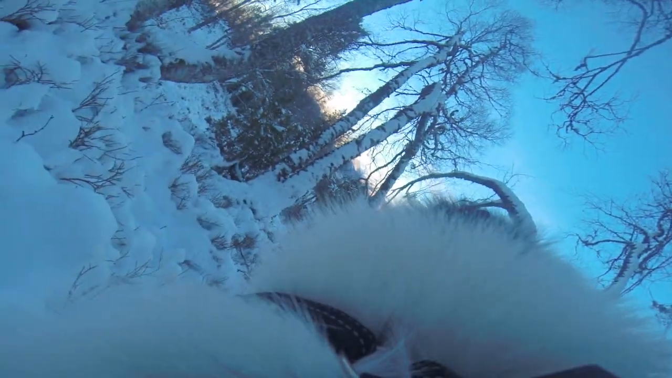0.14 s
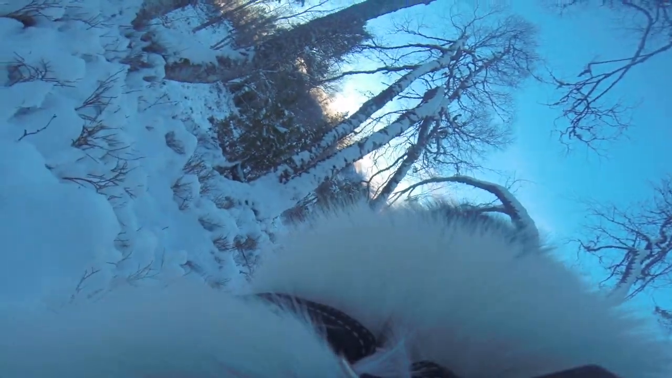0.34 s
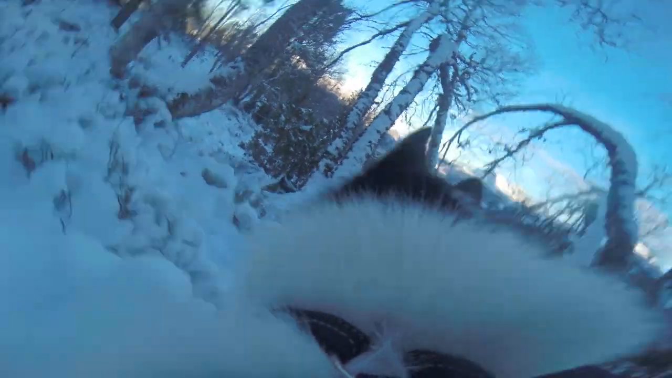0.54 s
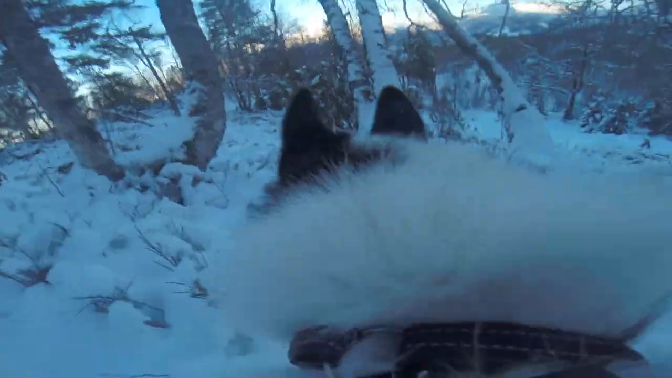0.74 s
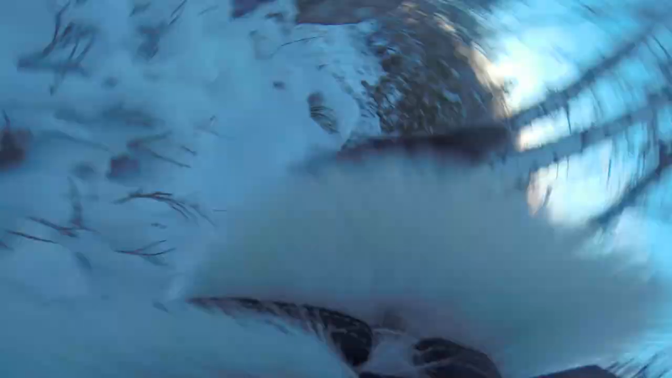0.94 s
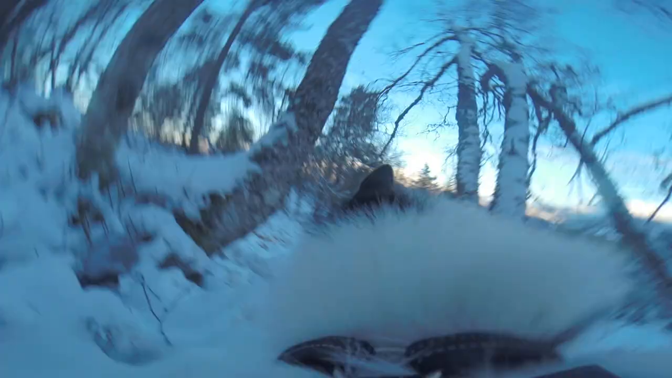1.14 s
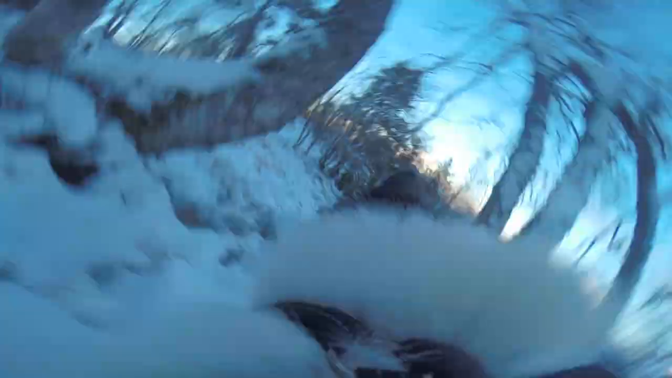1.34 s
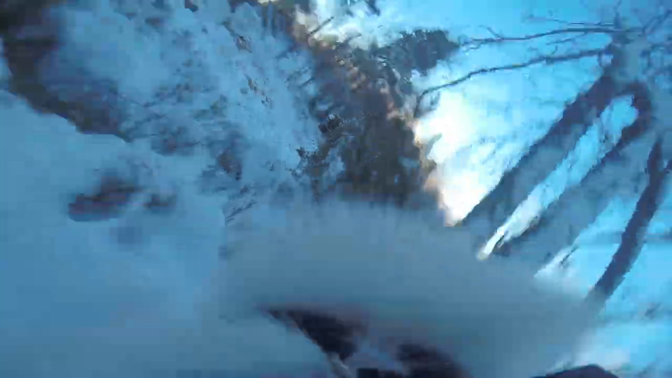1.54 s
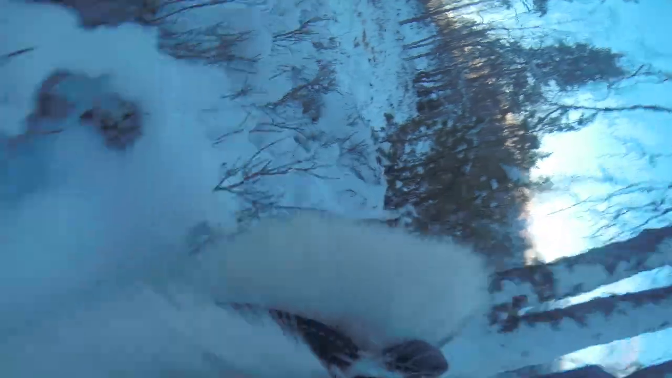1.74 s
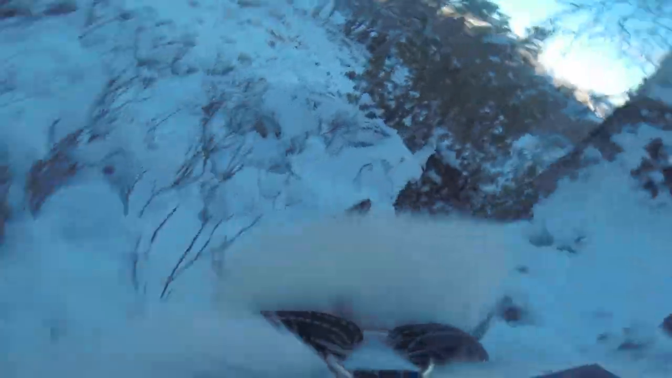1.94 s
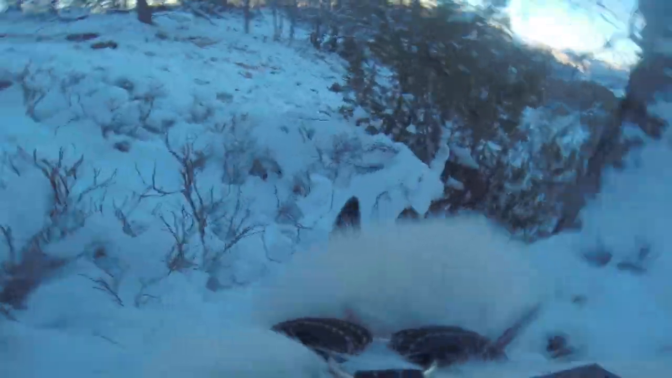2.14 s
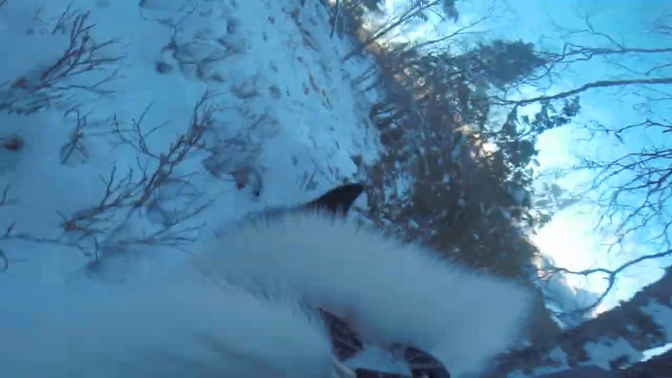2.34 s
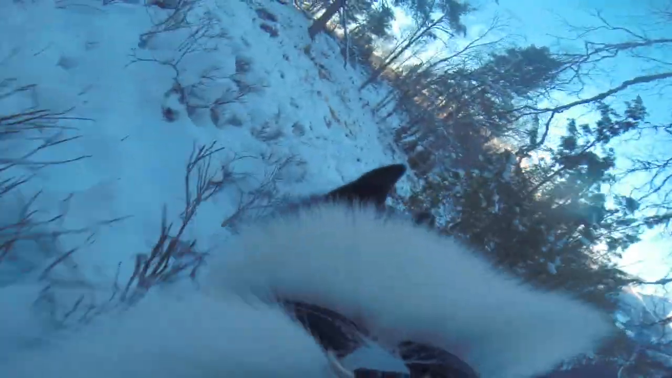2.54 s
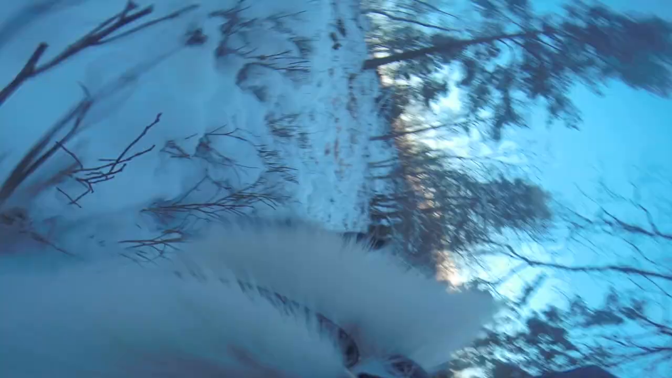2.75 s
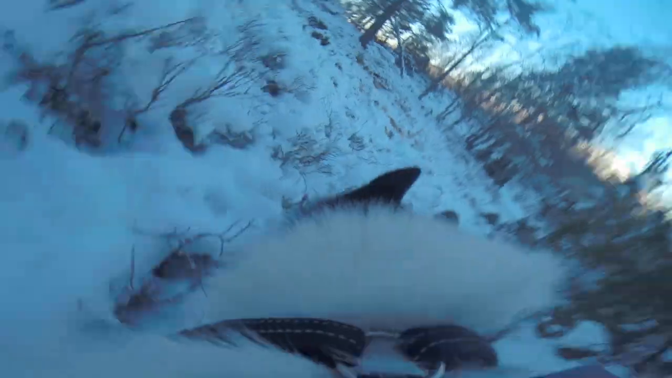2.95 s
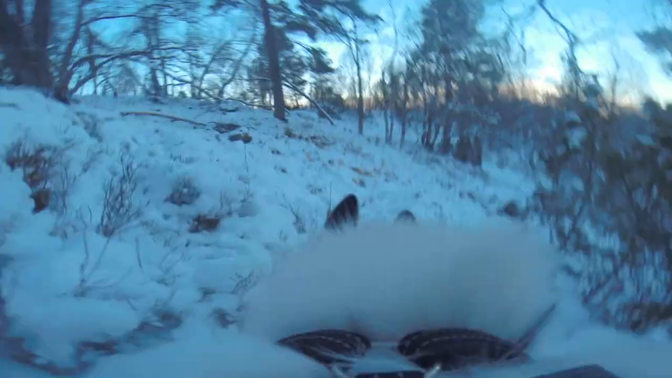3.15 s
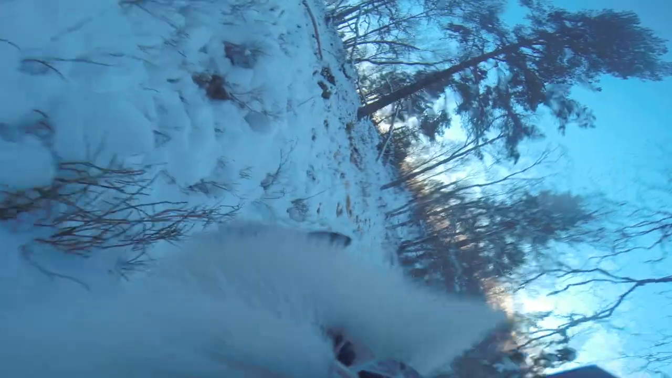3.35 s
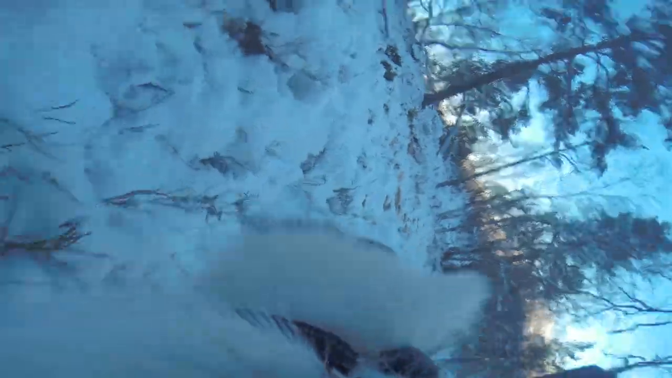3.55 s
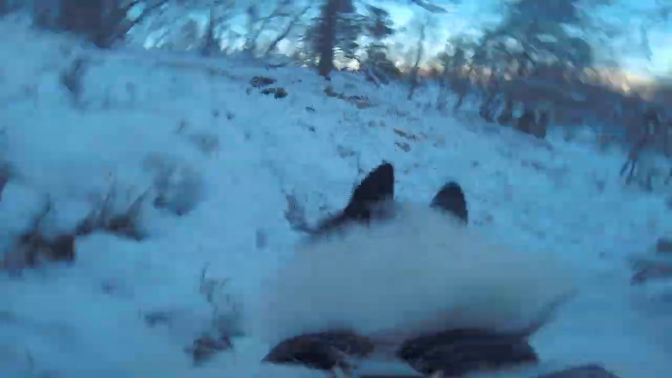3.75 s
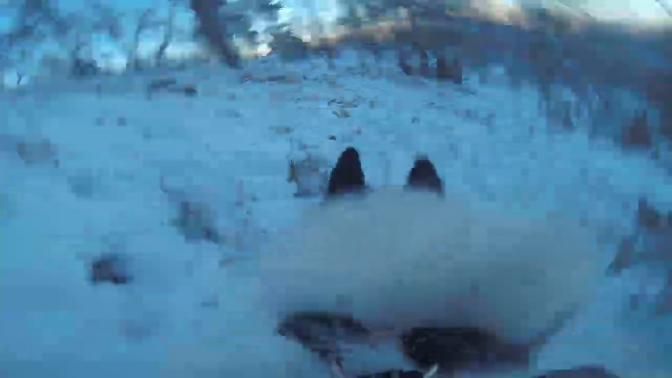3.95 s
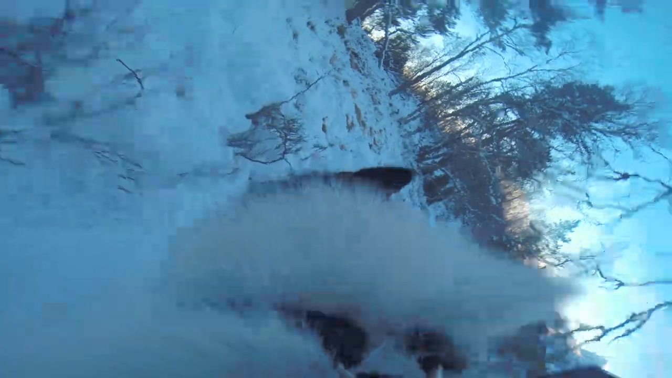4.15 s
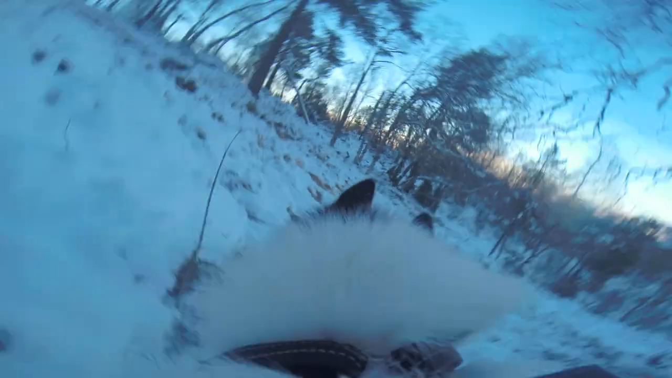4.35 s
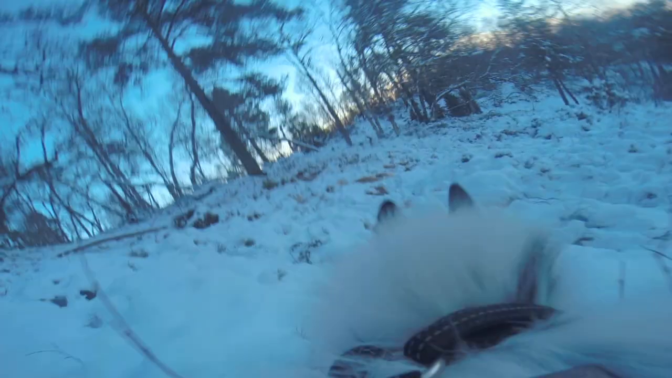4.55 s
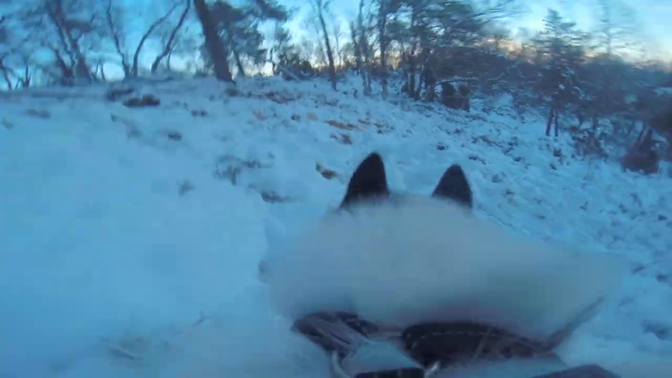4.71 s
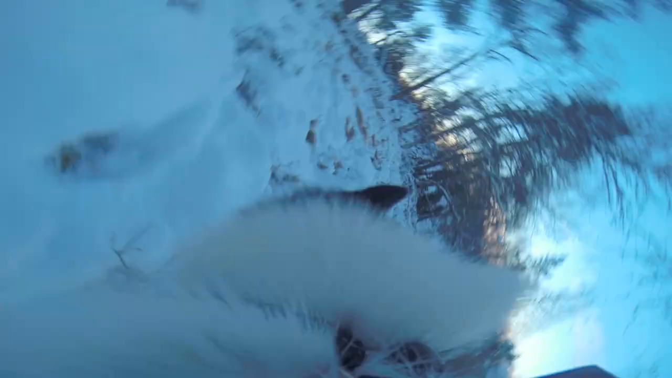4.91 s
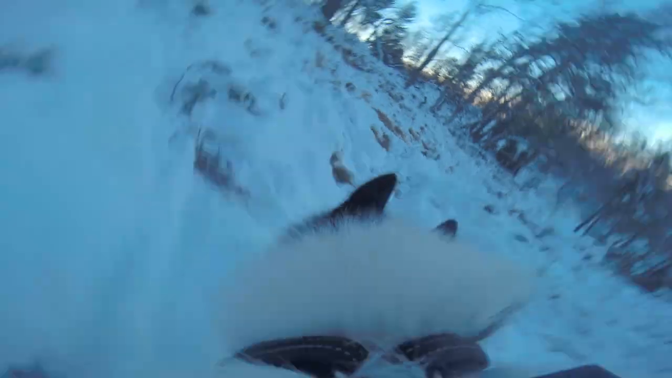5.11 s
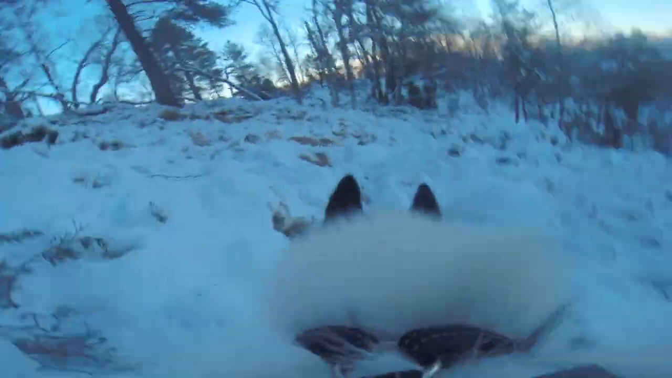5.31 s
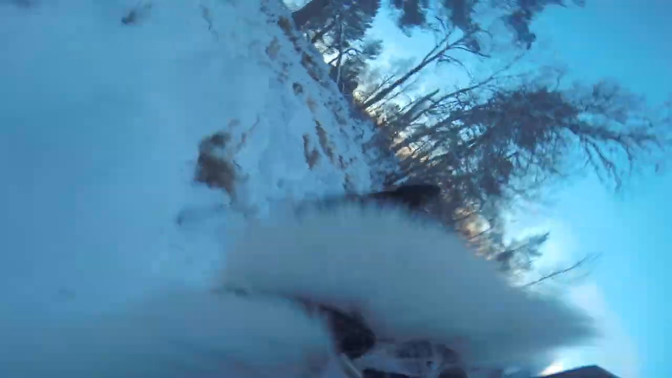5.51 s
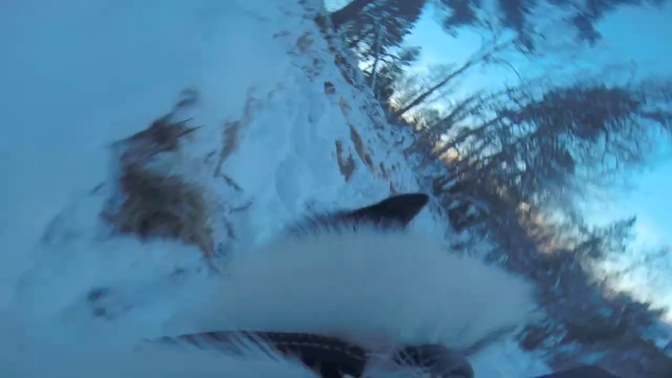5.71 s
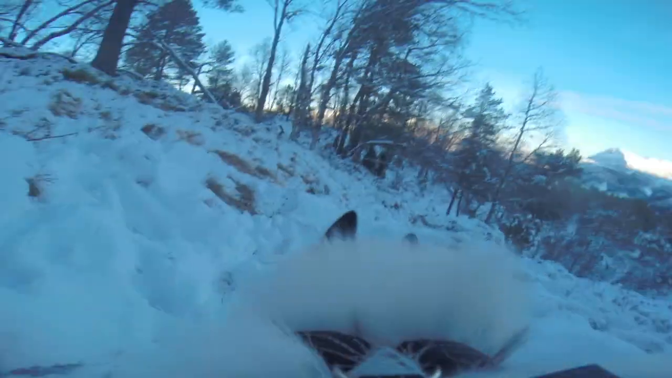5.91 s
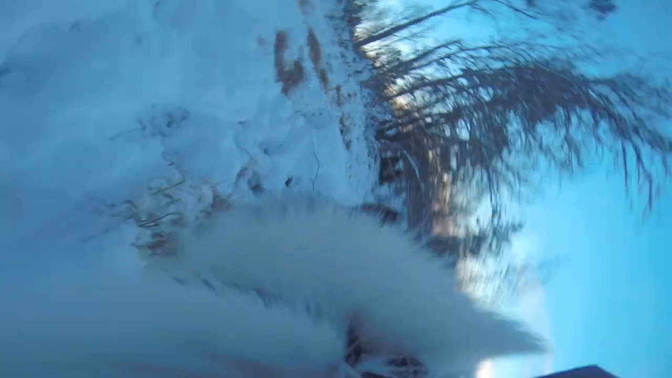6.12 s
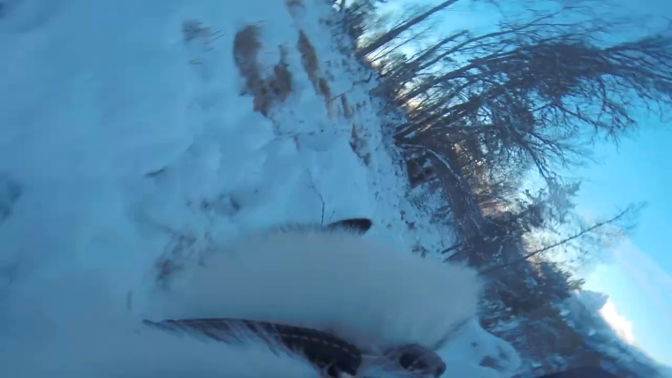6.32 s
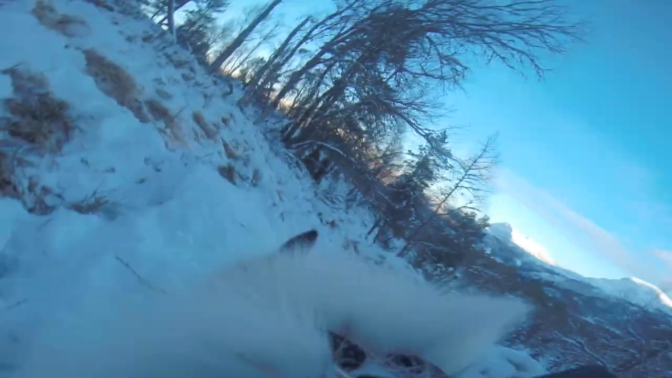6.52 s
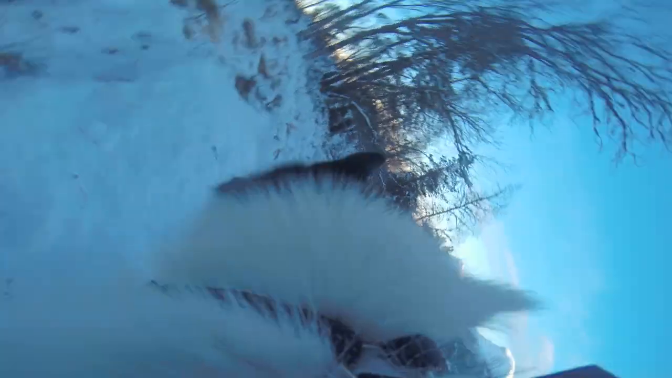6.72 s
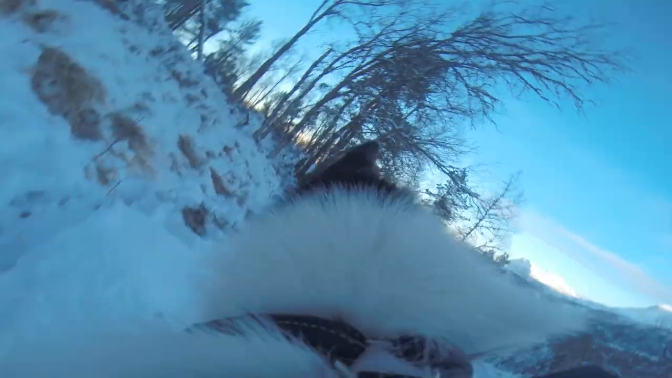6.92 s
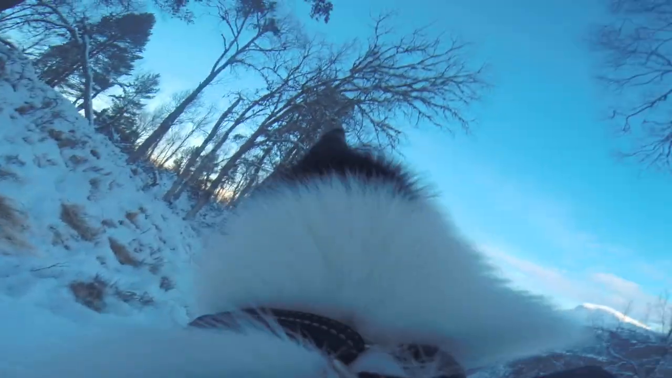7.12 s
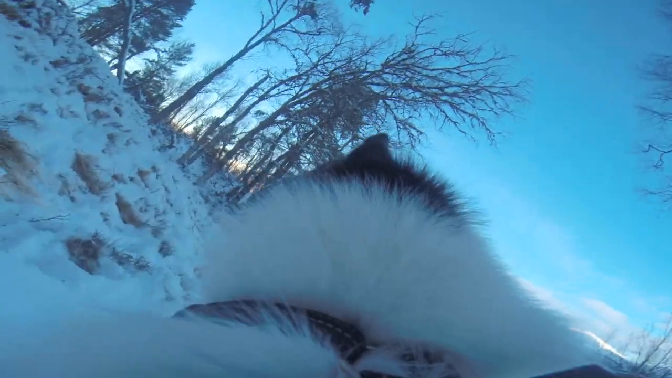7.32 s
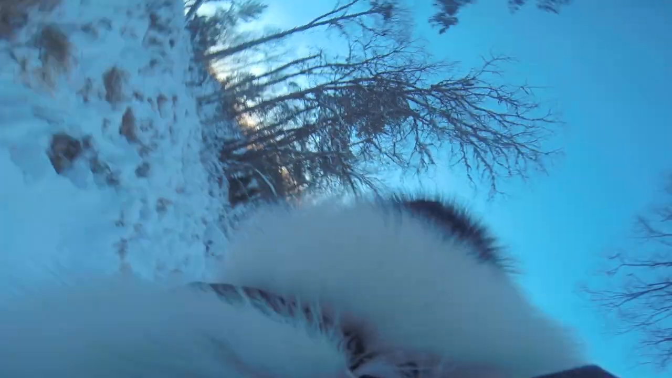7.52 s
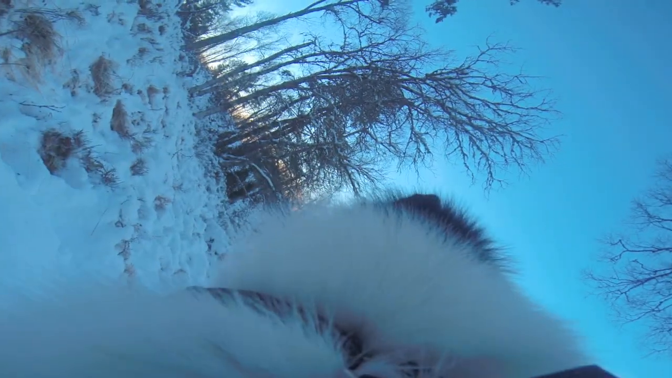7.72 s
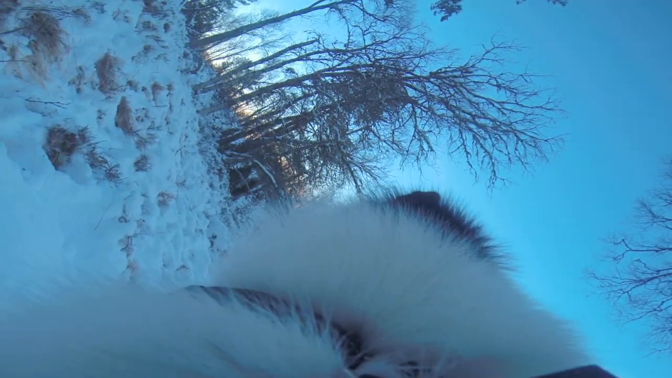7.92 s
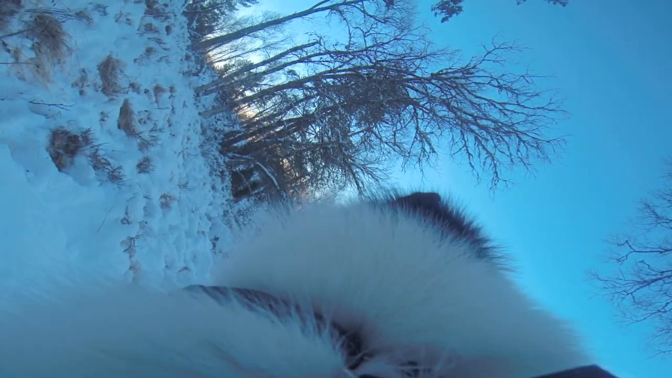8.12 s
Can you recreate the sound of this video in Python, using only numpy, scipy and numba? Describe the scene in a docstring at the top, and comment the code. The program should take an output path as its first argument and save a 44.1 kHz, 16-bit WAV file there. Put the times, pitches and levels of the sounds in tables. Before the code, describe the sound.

Hard, dry plastic knocks and muffled thuds jolt a camera case on a running dog's harness, with fur and straps swishing between.

```python
"""Faint hiss, a thin whine and a low rumble lead into irregular hard knocks with rustle and swishes between them.
A small camera in a sealed plastic housing rides on the harness of a dog that runs through a snowy wood.
Strides knock the housing in its mount, straps and fur rub it, the body bumps it, a twig hits and scrapes it.
Knocks, twig, thuds and rubbing excite one set of shell modes; a metal part rings after some knocks.
Pressure pulses make the bumps, lumpy low noise the sway, shaped noise and sines the hiss and whine."""
import sys
import numpy as np
from scipy import signal
from scipy.fft import rfft, irfft
from scipy.io import wavfile
from scipy.ndimage import uniform_filter1d
from numba import njit

SR = 44100
rng = np.random.default_rng(int(sys.argv[2]) if len(sys.argv) > 2 else 0)


def put_to_file(sound):
    """Save the sound as 16-bit audio at rate SR, in the file named by the first command-line argument."""
    columns = np.atleast_2d(sound).T  # one column per channel
    safe = np.clip(columns, -1, 1)
    whole_steps = np.round(safe * 32767)
    wavfile.write(sys.argv[1], SR, whole_steps.astype(np.int16))


N = 364486

# modes of the housing: mode_hz, struck_db (relative), t60_s, rubbed_db (relative resonance height)
SHELL_MODES = [(288, 9.5, 0.025, 6), (432, -6.5, 0.0032, -5.5), (481, -6.5, 0.012, -12.5),
               (840, -3.5, 0.01, -12), (1120, -30, 0.0037, -17.5), (1336, -16.5, 0.026, -8.5),
               (1530, -3.5, 0.027, -6.5), (1748, -3.5, 0.026, -2), (2070, 2.5, 0.017, -6.5),
               (2436, -8.5, 0.02, -16.5), (2638, -3.5, 0.022, -12.5), (3180, -6.5, 0.02, -16),
               (3392, -3.5, 0.014, -22), (4046, -16, 0.014, -25.5), (4410, -1.5, 0.0076, -3),
               (4670, -16, 0.024, -0.5), (5377, 8.5, 0.0054, -6), (6030, -15, 0.0023, -6.5),
               (5690, -0.5, 0.0036, -1.5), (6600, 1.5, 0.0012, -12.5), (7270, -23.5, .008, -12),
               (8500, -27.5, .004, -21.5), (8830, -18.5, 0.0044, -14.5), (9300, -28, 0.0024, -25.5),
               (11200, -31, 0.016, -21.5)]
# the body in motion: time_s, rumble_db, rustle_db (steady fur rustle, before the band offsets)
BODY_MOTION = [(0, -61.5, -87), (.45, -43.5, -67), (1.05, -37.5, -47.5), (1.65, -49.5, -66.5),
               (1.95, -48.5, -70), (2.5, -47, -63.5), (3.1, -47, -67.5), (3.45, -49.5, -60.5),
               (4.05, -45.5, -72.5), (4.35, -43.5, -61), (4.65, -37.5, -64.5), (5.25, -44, -57.5),
               (5.55, -54.5, -78), (5.85, -42.5, -59.5), (6.15, -48, -71.5), (6.5, -43, -62),
               (7.05, -50, -67), (7.4, -47, -76), (8.25, -63.5, -78.5)]


def undb(db):
    """Amplitude ratio of a level in dB."""
    return 10 ** (np.asarray(db) / 20)


def level(x, db):
    """Scale to an RMS level in dB."""
    return x * undb(db) / np.sqrt(np.mean(x ** 2))


def band(x, lo_hz, hi_hz, order=2):
    """Butterworth band-pass."""
    return signal.sosfilt(signal.butter(order, [lo_hz, hi_hz], "band", fs=SR, output="sos"), x)


def walk(rate_hz):
    """Random levels held 1 / rate_hz s and slewed twice; spread near 0.7."""
    hold = int(SR / rate_hz)
    steps = np.repeat(rng.standard_normal(N // hold + 1), hold)
    slewed = uniform_filter1d(uniform_filter1d(steps, hold), hold)
    return 0.98 * slewed[:N]


def add(out, start_s, x):
    """Mix x into out from start_s on."""
    i = int(start_s * SR)
    out[i:i + len(x)] += x[:N - i]


def curves(table):
    """Columns after the time, interpolated to every sample."""
    time_s, *columns = np.transpose(table)
    return [np.interp(np.arange(N) / SR, time_s, c) for c in columns]


def rings(modes):
    """Decaying sine of each mode after one sharp tap; opposite signs of neighbours make the sum build up first."""
    hz, db, t60_s = np.transpose(modes)[:3, :, None]
    t = np.arange(12000) / SR
    signs = (-1.) ** np.arange(len(modes))[:, None]
    decay = np.exp(-np.log(1000) * t / t60_s)
    return signs * undb(db) * np.sin(2 * np.pi * hz * t) * decay


def shell(ring, centre_hz, gains, octaves=0.24, top_hz=7600):
    """Bass, middle and treble answer of the housing; the place of contact favours middle modes near centre_hz."""
    hz = np.array(SHELL_MODES)[:, 0]
    low, high = hz < 600, hz > 4100
    near = 1 / (1 + (np.log2(hz / centre_hz) / octaves) ** 2)
    weights = low, near * ~(low | high), high
    bass, mid, treble = ((gains * w) @ ring[:, :3000] for w in weights)
    return band(bass, 100, 700), band(mid, 720, 4200, order=4), band(treble, 3700, top_hz, order=4)


def electronics():
    """Amplifier hiss as shaped noise, and the thin whine of the circuit as steady sines."""
    # hiss spectrum: freq_hz, density_db (relative, per Hz)
    hiss_shape = [(60, -4.5), (200, -2), (1000, -9.5), (3000, -13.5), (4500, -17), (7000, -21.5),
                  (12500, -28), (13200, -44), (15000, -68)]
    # whine: freq_hz, level_db (RMS)
    whine_tones = [(5846, -79.5), (8780, -80.5), (11719, -82), (14626, -88)]
    hz, db = np.transpose(hiss_shape)
    f = np.arange(N // 2 + 1) * SR / N
    gain = undb(np.interp(np.log(f + 1), np.log(hz), db))
    hiss = irfft(rfft(rng.standard_normal(N)) * gain, N)
    t = np.arange(N) / SR
    whine = sum(np.sqrt(2) * undb(tone_db) * np.sin(2 * np.pi * tone_hz * t) for tone_hz, tone_db in whine_tones)
    return level(hiss, -66) + whine


@njit
def follow(x, held, fall):
    """Peak level that jumps up at once and sinks by the factor fall per sample."""
    y = np.empty(len(x))
    for i in range(len(x)):
        held = max(abs(x[i]), held * fall)
        y[i] = held
    return y


def duck(noise, moving):
    """Loud peaks of the moving sound turn the gain of hiss and whine down; it recovers slowly."""
    threshold_db, recover_db_per_s, start_db = -10.5, 15, -6
    peak = follow(moving, float(undb(start_db)), float(undb(-recover_db_per_s / SR)))
    return noise * np.minimum(undb(threshold_db) / peak, 1)


def swaying():
    """Lumpy low pressure, as band-limited noise, as the harness shifts on the back."""
    lumps = band(rng.standard_normal(N) * undb(5.8 * walk(23)), 4, 180)
    rumble_db = curves(BODY_MOTION)[0]
    return undb(rumble_db) * level(band(lumps, 22, 32, order=1), 0)


def pressure():
    """Bass, middle and treble rubbing level in dB: steady rustle plus swishes that climb and drop linearly in dB."""
    # straps and fur swish over the housing: loudest_s, rise_s, fall_s, bass_db, mid_db, treble_db
    swishes = [(.546, 0.12, 0.044, -51, -46.5, -61.5), (0.704, 0.21, 0.21, -45, -37.5, -55.5),
               (0.935, 0.14, 0.14, -44, -37, -75), (1.054, 0.099, 0.13, -66, -41.5, -60),
               (1.256, 0.12, 0.14, -37, -35, -55.5), (1.457, 0.036, 0.032, -37, -26, -61),
               (1.512, 0.063, 0.013, -43.5, -29.5, -60), (1.68, 0.15, 0.13, -43.5, -39, -58),
               (2.066, 0.035, 0.24, -46.5, -40, -72.5), (2.15, 0.12, 0.018, -66, -43, -66),
               (2.355, 0.098, 0.059, -43.5, -37.5, -60.5), (2.688, 0.04, 0.027, -53, -38.5, -67),
               (2.759, 0.09, 0.3, -43, -38, -59), (3.185, 0.093, 0.16, -52.5, -53, -68.5),
               (3.378, 0.15, 0.054, -32.5, -32.5, -55.5), (3.664, 0.21, 0.094, -54, -51.5, -65.5),
               (3.844, 0.11, 0.23, -35.5, -39, -86), (3.957, 0.22, 0.091, -41.5, -29, -48),
               (4.062, 0.083, 0.051, -44.5, -38.5, -50), (4.462, 0.096, 0.039, -60, -40, -60),
               (4.625, 0.2, 0.14, -42, -36.5, -58), (4.918, 0.029, 0.19, -45.5, -44, -67.5),
               (5.079, 0.12, 0.051, -57.5, -51.5, -61.5), (5.31, 0.076, 0.07, -42.5, -39.5, -62.5),
               (5.353, 0.071, 0.05, -59, -47, -62), (5.447, 0.057, 1, -61.5, -51.5, -83),
               (5.625, 0.037, 0.12, -54, -36.5, -64), (5.706, 0.051, 0.028, -42, -33, -46),
               (5.755, 0.096, 0.03, -46, -46, -60.5), (5.964, 0.18, 0.29, -57.5, -53.5, -89),
               (6.11, 0.041, 0.47, -55.5, -43.5, -78), (6.266, 0.22, 0.11, -52, -41.5, -57.5),
               (6.428, 0.11, 0.25, -58, -57.5, -78.5), (6.602, 0.064, 0.11, -53, -48, -67),
               (6.816, 0.12, 0.041, -53.5, -45, -65), (6.976, 0.13, 0.11, -53.5, -54.5, -77.5),
               (7.089, 0.076, 0.38, -53.5, -55, -90.5), (7.356, 0.14, 0.078, -76, -55, -72.5),
               (7.601, 0.25, 0.1, -50, -44.5, -61.5)]
    range_db = 28  # climb in rise_s, drop in fall_s
    rustle_offset_db = np.array((-5, 3, -11.5))  # bass, middle, treble
    t = np.arange(N) / SR
    power = undb(2 * (curves(BODY_MOTION)[1] + rustle_offset_db[:, None]))
    for loudest_s, rise_s, fall_s, *db in swishes:
        before, after = (loudest_s - t) / max(rise_s, .01), (t - loudest_s) / max(fall_s, .01)
        drop_db = range_db * np.maximum(before, after)
        power = power + undb(2 * np.array(db))[:, None] * undb(-2 * drop_db)
    return 10 * np.log10(power)


def rubbing(ring):
    """Dense uneven slips and crumbs keep the modes ringing; two places of contact shift the colour."""
    patchy_db = 1.6 * walk(45) + 3.8 * walk(220)
    crumb_on = rng.random(N) < 160 / SR  # about 160 per s
    crumbs = 1 + crumb_on * undb(10 + 2.5 * rng.exponential(size=N))
    _, struck_db, t60_s, rubbed_db = np.transpose(SHELL_MODES)
    gains = undb(rubbed_db - struck_db) / t60_s  # a long ring piles up, so divide by its length
    out, levels_db = 0, pressure()
    for place_hz in (1100, 2700):
        parts = shell(ring, place_hz, gains, octaves=0.92, top_hz=12800)
        for part, db in zip(parts, levels_db):
            uneven = rng.standard_normal(N) * crumbs * undb(patchy_db + 4.1 * walk(30))
            slips = level(uneven, db - 1.0)
            unit_part = part / np.sqrt(np.sum(part ** 2))
            out = out + signal.oaconvolve(slips, unit_part)[:N]
    # an airy edge of the last treble slips reaches the microphone directly
    return out + undb(-10.0) * band(slips, 3800, 7600, order=1)


def bumps():
    """The body shoves the camera: slow pressure pulses; the air leaks away behind each, so they swing back."""
    # shoves: centre_s, peak_db (before the band-pass), width_ms (at half height)
    shoves = [(0.515, -23.5, 18), (0.598, -24, 1.7), (0.683, -12.5, 1.24), (0.978, -18, 8.9),
              (1.269, -13.5, 3.7), (1.298, -11, 12), (1.656, -8, 6.7), (1.716, -29, 5.7),
              (2.766, -26.5, 2.3), (2.78, -31.5, 5.7), (3.103, -24.5, 10.6), (3.301, -17, 1.58),
              (3.376, -20.5, 3.7), (3.41, -27.5, 3.4), (3.9036, -12.5, 3.9), (3.943, -9.5, 5.6),
              (4.514, -43, 3.4), (4.536, -32.5, 1.7), (4.62, -23.5, 3.3), (4.669, -5.5, 1.25),
              (4.711, -28.5, 1.6), (5.105, -31.5, 4.7), (5.318, -18.5, 10.4), (5.679, -24.5, 30),
              (5.76, -21, 9.9), (5.907, -22.5, 16), (6.236, -15, 11), (6.533, -23.5, 17.6),
              (6.769, -29, 11), (6.838, -23, 21), (7.613, -19, 5.9)]
    out, t = np.zeros(N), np.arange(-2000, 2000) / SR
    for centre_s, db, width_ms in shoves:
        pulse = np.exp(-4 * np.log(2) * (1000 * t / width_ms) ** 2)
        add(out, centre_s + t[0], undb(db) * pulse)
    return band(out, 19, 490)


def twig_scrape(ring):
    """A twig drags over the housing: clustered ticks through the modes, and sharp grit with bright snags."""
    # bright snaps of the twig: time_s, snag_db (over the ticks)
    snags = [(2.8276, 29), (2.8301, 29.5), (2.8562, 20), (2.8732, 10.5), (2.879, -2), (2.885, 1),
             (2.903, 4.5), (2.914, 12), (2.922, 10), (2.9335, 23.5)]
    (start_s, end_s), ticks_per_s, tick_decay_s = (2.828, 2.943), 800, .0009
    t = np.arange(N) / SR
    on = (t > start_s) & (t < end_s)
    hits = rng.random(N) < ticks_per_s / SR
    ticks = hits * rng.standard_normal(N) * undb(7 * walk(160)) * on
    decay = np.exp(-np.arange(200) / SR / tick_decay_s)
    tick = rng.standard_normal(200) * decay
    mid = shell(ring, 1900, 1., octaves=0.84)[1]
    body = signal.oaconvolve(ticks, np.convolve(tick, mid))[:N]
    for time_s, db in snags:
        add(ticks, time_s, undb([db]))
    grit = rng.standard_normal(N) * signal.oaconvolve(np.abs(ticks), decay)[:N]
    bright, top = band(grit, 2000, 8000), band(grit, 7000, 13500, order=4)
    share = np.sqrt(on.mean())  # makes the levels RMS over the scrape alone
    return share * (level(body, -29) + level(bright, -26.0) + level(top, -42.5))


def thuds(ring):
    """Dull thuds of the mount on the back: a soft 3.9 ms push reaches only the lowest modes."""
    # thuds: start_s, peak_db
    soft_pushes = [(0.598, -19), (1.267, -13.5), (1.313, -21), (1.499, -15), (3.298, -40), (3.375, -18),
                   (3.803, -29), (3.901, -6.5), (3.941, -22.5), (4.665, -24), (4.896, -54), (5.252, -21),
                   (5.675, -14.5), (5.759, -38), (5.424, -22), (7.066, -41.5), (7.603, -17), (7.775, -48)]
    bass = shell(ring, 1700, 1.)[0]
    thud = np.convolve(bass, np.hanning(int(0.0039 * SR)))
    out = np.zeros(N)
    for start_s, db in soft_pushes:
        add(out, start_s, undb(db) * thud / np.abs(thud).max())
    return out


def clinks():
    """A metal part of the mount rings on after hard knocks; its ring fades in over 2.5 ms."""
    # modes of the metal part: mode_hz, level_db (relative), t60_s
    metal_modes = [(1836, 0, .21), (2751, -8, .11)]
    # clinks: start_s, gain_db (on the summed modes)
    strikes = [(0.684, -38), (1.48, -34), (1.594, -38), (1.725, -31.5), (2.367, -37), (2.934, -28.5),
               (4.111, -30), (5.253, -34.5), (5.426, -35.5), (5.932, -37), (6.403, -36.5), (6.951, -39.5),
               (7.066, -45), (7.605, -36)]
    out, metal = np.zeros(N), rings(metal_modes).sum(axis=0)
    pickup = np.minimum(np.arange(len(metal)) / 110.0, 1)
    for start_s, db in strikes:
        add(out, start_s, undb(db) * metal * pickup)
    return out


def knocks_and_twig_hits(ring):
    """Mount knocks and twig hits: each contact and quick weaker ones after it ring the modes a little differently."""
    # the housing knocks in its mount; the close run from 2.827 to 2.934 s is the twig hitting it:
    # time_s, peak_db, colour_centre_hz, bass_db, treble_db (both relative to the middle)
    contacts = [(0.378, -22.5, 1710, -17.5, -57), (0.5199, -11.5, 1540, -16, -84),
                (0.6815, 0.9, 1790, -25, -19.5), (0.7303, -24, 1930, 7, -12),
                (0.9122, -1.5, 1680, -23.5, -28), (1.2324, -0.6, 1430, -20, -33),
                (1.316, -22, 1400, -22, -43), (1.3216, -5, 1910, -5.5, -23.5),
                (1.4779, -4.5, 2010, -18, -19), (1.4801, -1, 1960, -28, -18),
                (1.5924, -4.5, 1610, -23, -21.5), (1.7262, 2.24, 2030, -24.5, -15),
                (2.0695, -34, 1470, -8.5, -43), (2.365, -1, 1860, -26.5, -19.5),
                (2.5113, -18, 1530, -22.5, -47), (2.803, -1.3, 1840, -28, -19), (2.8269, -6, 2390, -16, -2),
                (2.832, 3.7, 2170, -45, -10), (2.842, -13, 2400, -40, -18), (2.8465, -10, 2280, -45, -11),
                (2.8575, -16, 2120, -22, -16), (2.9039, -10.5, 2320, -37, -43),
                (2.9242, -12, 2030, -22, -11), (2.9314, -18, 1910, -23, -10), (2.934, -4, 1700, -23.5, -24),
                (3.22, -13, 1550, -17.5, -30), (3.35, -0.55, 1700, -23, -14.5),
                (3.8052, -5, 1530, -19.5, -43.5), (3.886, -16, 2020, -25, -41),
                (3.9024, -15.5, 2070, -5, -42), (3.9433, -4, 1880, -4, -27), (3.958, -29, 2000, -20, 4),
                (4.1077, -0.5, 2070, -26.5, -19), (4.126, -6, 1720, -24.5, -24.5),
                (4.4294, -2.5, 1500, -23.5, -30), (4.4687, -23.5, 1470, -12.5, -62),
                (4.5517, -4.5, 1800, -26.5, -27.5), (4.565, -11, 1580, -23, -55),
                (4.667, -2, 2000, -56, -14.5), (4.8961, -2, 2000, -18.5, -29),
                (4.9262, -24, 1540, -11.5, -39), (5.251, -0.74, 1660, -22.5, -29),
                (5.309, -34, 1530, -15, -32), (5.4234, 0.06, 2010, -23.5, -24),
                (5.507, -12.5, 1830, -24, -32), (5.6478, -4.5, 1790, -27.5, -21.5),
                (5.679, -9.5, 1450, -5.5, -34), (5.9314, 0, 1870, -23.5, -22.5),
                (6.1363, -43, 1780, -14, 2), (6.187, -19, 1640, -23, -48), (6.193, -7.5, 1860, -24.5, -21),
                (6.404, -1.9, 2020, -22.5, -19.5), (6.5774, -11, 1630, -19.5, -38),
                (6.951, -3, 2070, -21.5, -19.5), (7.0651, -9, 1490, -23.5, -34),
                (7.12, -15, 1480, -22, -45), (7.222, -13, 2030, -22.5, -25.5), (7.604, 0, 1950, -24, -19.5),
                (7.799, -35.5, 1560, -12.5, -29), (7.9111, -42, 1510, -46.5, -29)]
    chatter_decay_s, build_up_s = 0.0046, 0.00079
    snap_s, tail_db = 0.0037, -5.5  # the first swing is damped fast and leaves a weaker ring
    out, t = np.zeros(N), np.arange(256) / SR
    chatter = rng.standard_normal((len(contacts), len(t)))
    spread = rng.standard_normal((len(contacts), len(SHELL_MODES)))
    for (time_s, db, centre_hz, bass_db, treble_db), c, g in zip(contacts, chatter, spread):
        push = (t == 0) + 0.078 * c * np.exp(-t / chatter_decay_s)
        # the duller the sound, the longer the contact lasts
        touch = np.hanning(3 + int(.6 * np.clip(-treble_db - 30, 0, 30)))
        push = np.convolve(push, touch)
        # a dull contact wakes fewer modes
        octaves = 0.75 * undb(0.1 * (treble_db + 20))
        parts = shell(ring, centre_hz, undb(1.5 * g), octaves, top_hz=10200)
        low, mid, high = (signal.fftconvolve(p, push) for p in parts)
        age_s = np.arange(len(mid)) / SR
        damping = np.exp(-age_s / snap_s) + undb(tail_db)
        envelope = damping * (1.15 - np.exp(-age_s / build_up_s))
        low, mid, high = (p / np.abs(p).max() for p in (low, mid * envelope, high * envelope))
        sound = mid + undb(bass_db) * low + undb(treble_db) * high
        add(out, time_s - .0005, undb(db) * sound / np.abs(sound).max())
    return out


def scene():
    """Mix all sounds of motion over the ducked hiss and whine."""
    ring = rings(SHELL_MODES)
    moving = swaying() + rubbing(ring) + bumps() + twig_scrape(ring) + thuds(ring) + clinks()
    moving = moving + knocks_and_twig_hits(ring)
    # the housing barely moves between its bass and middle modes
    notch_hz, notch_width_hz = 660, 90
    moving = signal.lfilter(*signal.iirnotch(notch_hz, notch_hz / notch_width_hz, SR), moving)
    return (moving + duck(electronics(), moving))[None]


def record(dry):
    """The loudest peaks are rounded at full scale and the top is cut at 15.9 kHz."""
    rounded = dry / (1 + np.abs(dry) ** 14) ** (1 / 14)
    return signal.sosfilt(signal.ellip(8, .2, 70, 15900, fs=SR, output="sos"), rounded)


dry = scene()
out = record(dry)
put_to_file(out)
```